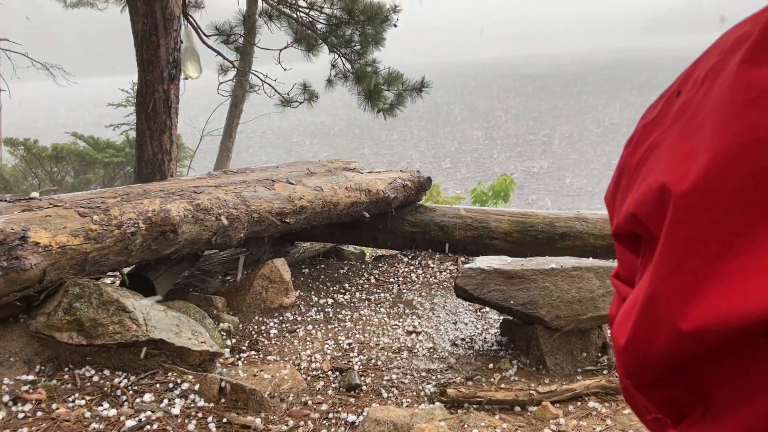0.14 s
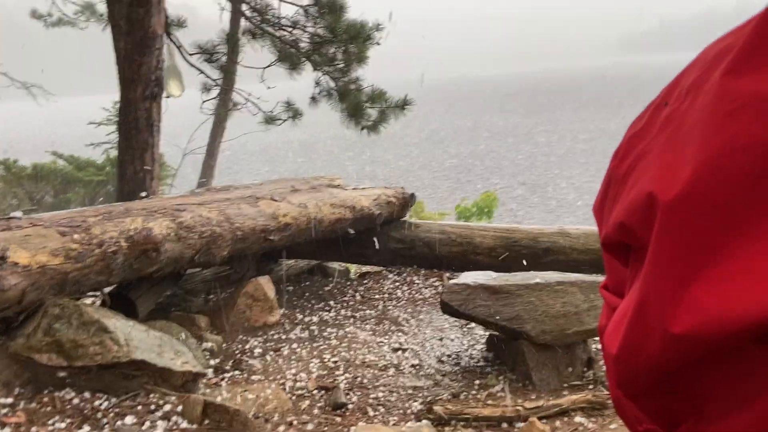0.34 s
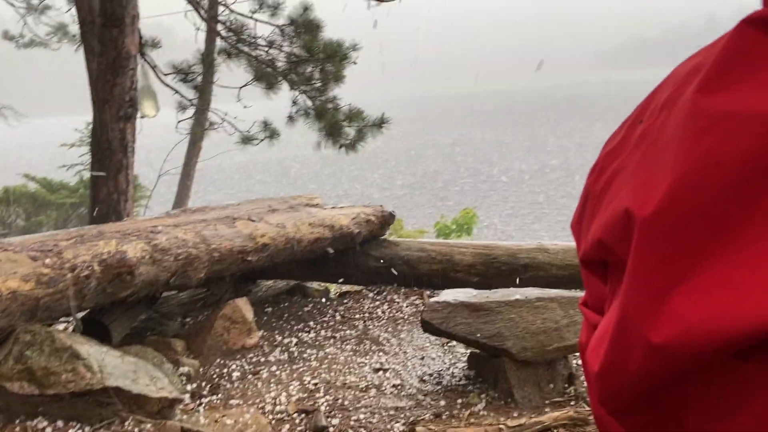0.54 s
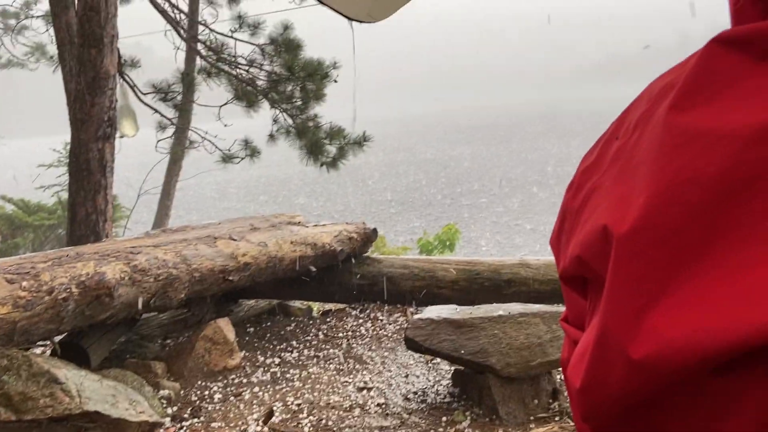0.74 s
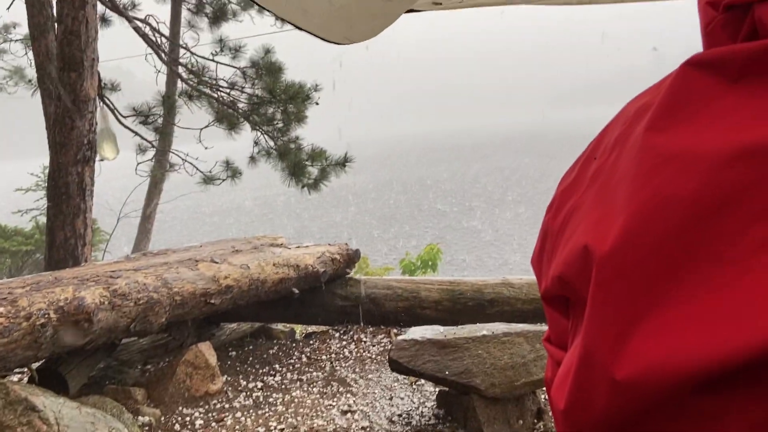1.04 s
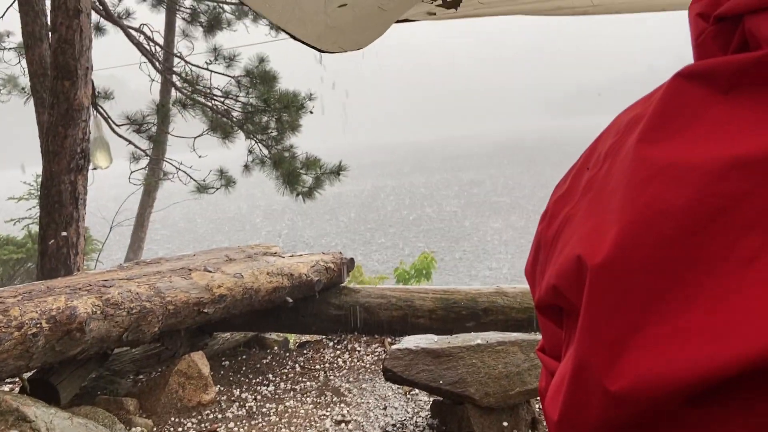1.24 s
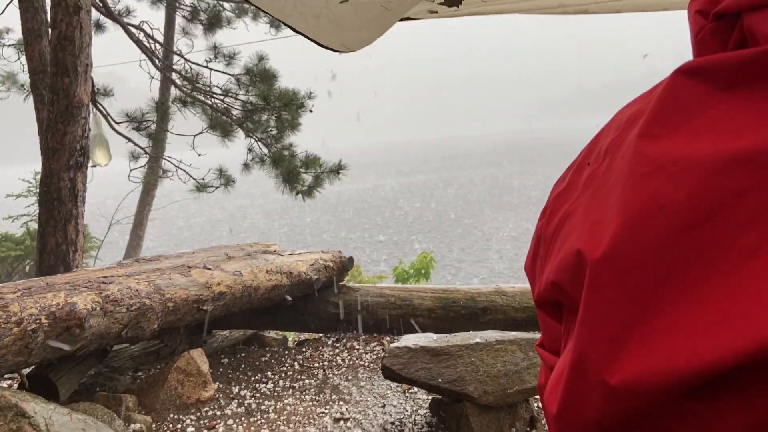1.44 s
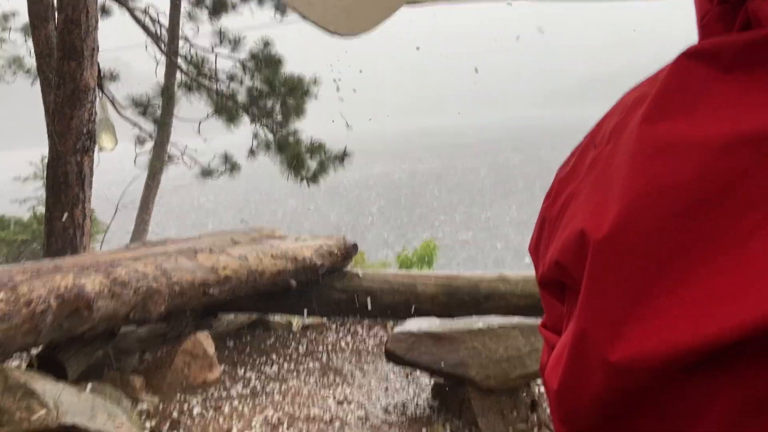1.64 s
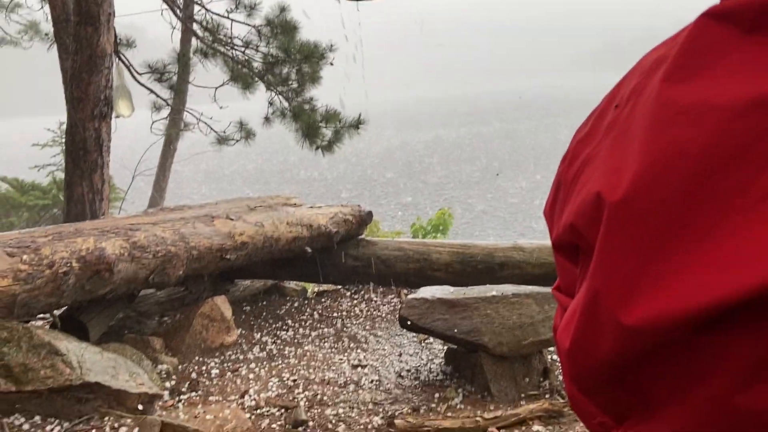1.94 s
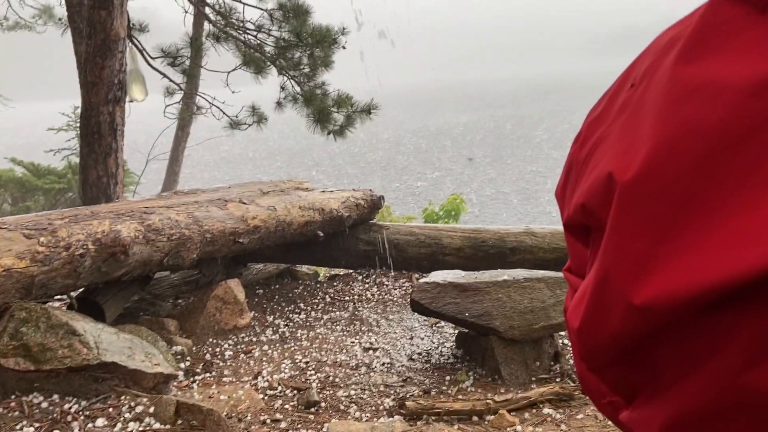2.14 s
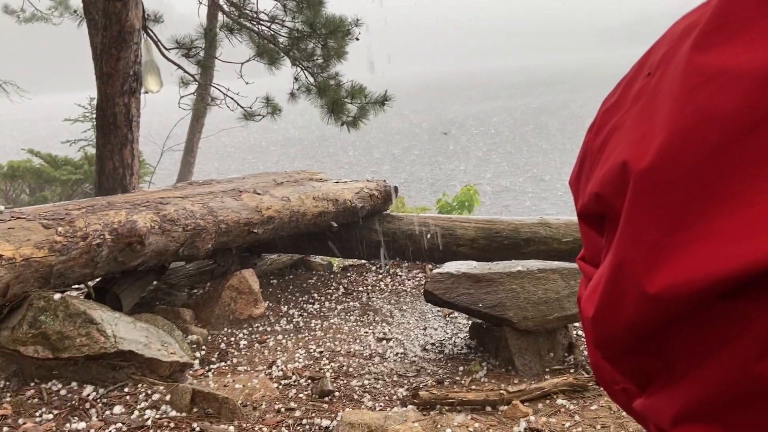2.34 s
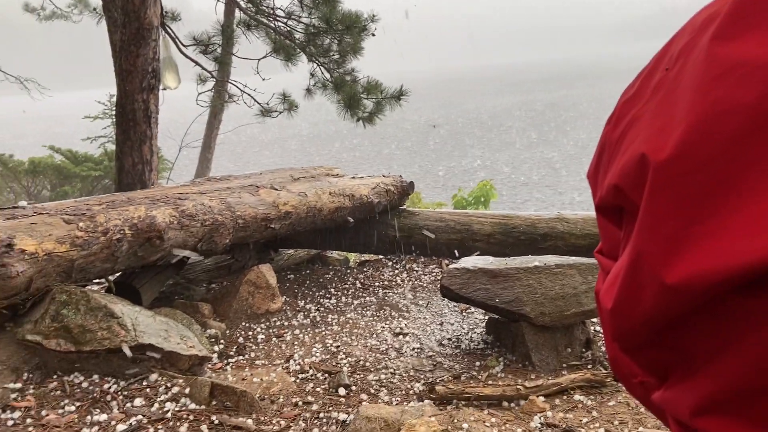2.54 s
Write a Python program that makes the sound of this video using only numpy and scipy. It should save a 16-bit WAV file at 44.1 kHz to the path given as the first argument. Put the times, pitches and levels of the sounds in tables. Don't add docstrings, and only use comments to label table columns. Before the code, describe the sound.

Close, loud, unbroken hail on taut cloth at an outdoor camp: irregular knocks and slaps, thuds from the swaying sheet, crackling ice, ticks on rock and log, a few near splashes, over a wide rain hiss.

```python
import sys
import numpy as np
from scipy import signal
from scipy.fft import rfft, irfft
from scipy.io import wavfile
from scipy.ndimage import uniform_filter1d

SR = 44100
rng = np.random.default_rng(int(sys.argv[2]) if len(sys.argv) > 2 else 0)


def wav_record(signal):
    frames = np.transpose(np.atleast_2d(signal))
    bounded = np.clip(frames, -1, 1)
    quanta = np.round(bounded * 32767).astype(np.int16)
    wavfile.write(sys.argv[1], SR, quanta)


def gain_from_db(level_db):
    decades = np.asarray(level_db, float) / 20
    return 10 ** decades


N = 119070

# (time [s], slap level [dB], knock over slap [dB], knock pitch
# [Hz], crack over slap [dB])
STONES = [(0.119, -12, -4, 804, -0.5), (0.132, -23, 13.5, 556, -17), (0.16, -18.5, 6.5, 755, -20),
          (0.229, -18.5, 6, 797, -15), (0.247, -12.5, -9, 1480, -1), (0.261, -11.5, 2, 614, -2.5),
          (0.314, -10.5, -4, 790, -2), (0.367, -14, -25, 603, -2), (0.461, -14, 7.5, 626, 4),
          (0.47, -16, 10, 900, -1), (0.561, -16.5, 7.5, 720, 6), (0.583, -9, -6, 842, -27),
          (0.655, -21, 14, 694, -10), (0.68, -21.5, 8.5, 603, -14), (0.744, -25.5, 20.5, 1126, 13),
          (0.761, -7.5, -4, 685, -1), (0.874, -5, -5.5, 1190, -3), (0.902, -8.5, 0, 600, -7),
          (0.919, -14, 4, 659, -10), (0.934, -13, -8, 716, -1),
          (0.949, -11, 0.5, 870, 4), (0.967, -10, 5.5, 560, -24), (0.994, -10, 2, 720, 1.5),
                 (1.019, -15.5, -2, 603, -4), (1.052, -11, 1, 1500, 0), (1.073, -18.5, 10, 900, 4),
                 (1.084, -9, 3.5, 800, -10), (1.133, -12.5, 6.5, 1090, -10), (1.155, -15.5, 10.5, 710, -11),
                 (1.217, -22.5, 15.5, 664, -10), (1.236, -24, 13.5, 675, -13), (1.271, -8.5, 3.5, 790, -17),
                 (1.307, -16, 3.5, 830, -3), (1.345, -18.5, 10.5, 815, -7), (1.426, -15.5, 1, 1110, -13),
                 (1.472, -8.5, 1.5, 935, -6), (1.528, -28.5, 14, 1250, -9), (1.566, -17.5, 6.5, 810, 4),
                 (1.609, -11, 0, 617, -10), (1.625, -20.5, 10.5, 1420, -13), (1.692, -13, 7.5, 1140, -28),
          (1.732, -10, -13, 600, 0.5), (1.745, -23, 12, 600, -4), (1.768, -28, 9, 594, -10),
               (1.81, -11, -1, 890, -7), (1.829, -8.5, -1.5, 714, -4), (1.874, -11.5, 4, 1090, 0.5),
               (1.928, -6.5, -1, 830, -6), (2.06, -20, 9, 685, -6), (2.073, -19.5, 11, 1330, 0),
               (2.131, -12, -5, 980, -10), (2.171, -23, 9, 713, -8), (2.197, -11.5, 2.5, 738, -5),
               (2.213, -12, 4.5, 1370, 3), (2.275, -12.5, 4, 2080, -22), (2.353, -11.5, -4, 673, -6),
               (2.405, -23, 11, 746, -9), (2.431, -21.5, 14, 638, 5.5), (2.493, -19.5, 13, 560, -5),
               (2.504, -18.5, 5, 760, 6), (2.528, -18, 5, 770, -9), (2.581, -13, 0.5, 600, 1),
               (2.629, -26, 15, 641, -14), (2.646, -20, 3.5, 2140, -2)]
# (time [s], peak level [dB], pitch [Hz])
BOOMS = [
    (0.269, -19, 70),
    (0.55, -19, 117),
    (0.941, -19.5, 70.4),
    (1.059, -11, 134),
    (1.271, -20, 89),
    (1.927, -16.5, 81),
    (2.195, -13, 115),
    (2.479, -18, 97),
    (2.635, -14, 84),
]
# (time [s], peak level [dB], pitch [Hz])
SWAYS = [(.31, -24, 79.6), (.37, -24, 95), (0.462, -14.5, 160), (0.544, -13.5, 164), (0.752, -18, 170),
         (1.28, -21, 100), (.995, -20, 81), (1.127, -19.5, 87.5), (1.463, -25, 127), (1.55, -24, 84.5),
         (1.598, -19, 160), (2.071, -22, 147), (2.199, -15.5, 167), (2.245, -19.5, 70.6),
         (2.271, -18.5, 160), (2.529, -20.5, 75)]
# (time [s], peak level [dB], slap pitch [Hz])
PEBBLES = [(.005, -19, 483), (.045, -21, 756), (.057, -21, 685), (0.139, -7, 480), (0.227, -19, 1080),
           (.283, -17, 540), (.334, -14.5, 664), (0.344, -14, 490), (.385, -15, 450), (.437, -20, 567),
           (0.477, -10, 435), (.527, -17.5, 600), (.545, -18, 680), (.66, -12.5, 890), (0.705, -20.5, 590),
           (.852, -17, 405), (0.981, -14, 390), (1.028, -16, 880), (1.118, -17, 730), (1.182, -12, 296),
           (1.264, -17, 666), (1.323, -15, 350), (1.399, -19, 550), (1.646, -13.5, 484), (1.749, -10, 470),
           (1.783, -12.5, 660), (1.856, -31, 726), (1.901, -17, 554), (1.96, -14.5, 373),
           (2.19, -17.5, 730), (2.231, -14.5, 356), (2.637, -14.5, 395), (2.671, -15, 690),
           (1.053, -8, 540), (.995, -7, 454)]
# (time [s], peak level [dB], pitch [Hz])
SHARDS = [(.003, -14, 5100), (.335, -13, 3490), (.416, -9, 2290), (0.658, -24, 1800), (.852, -15, 4800),
          (0.933, -15, 1720), (1.083, -8, 1710), (1.218, -11, 1600), (1.693, -25, 1900), (1.749, -18, 2030),
          (2.221, -9, 4880), (2.352, -11, 2910), (2.424, -12, 4000), (2.492, -18, 2330),
          (2.647, -10.5, 4360)]
# (time [s], peak level [dB], pitch [Hz])
TICKS = [(0.0136, -5, 2430), (0.0568, -7.5, 2470), (0.349, -17, 3130), (0.5219, -8, 4560),
         (0.5451, -9.5, 2210), (0.9487, -9, 3040), (0.9948, -13, 2090), (1.3616, -6.5, 2650),
         (2.1262, -12, 2780), (2.2304, -9.5, 2920), (2.376, -9, 3150), (2.6383, -8.5, 1860)]
# (time [s], peak level [dB])
SPLASHES = [
    (0.347, -9),
    (0.993, -29),
    (1.32, -7),
    (2.0802, -3.5),
]
# (time [s], level [dB])
POUR = [(0, -5.5), (.06, -6), (.09, -6.5), (.13, -5.5), (.5, -4.5), (.9, -3.5), (1.2, -3.5), (1.499, -4.5),
        (2.2, -4.5), (2.7, -4)]
# (frequency [Hz], level per Hz [dB])
WASH_SPECTRUM = [(30, -1), (60, -2), (150, -3.5), (225, -14.5), (350, -7), (1500, -16.5), (5500, -22),
                 (15000, -33)]
# (frequency [Hz], correlation [-1..1])
WASH_LIKENESS = [(60, 0.98), (170, 0.98), (400, 0.2), (900, 0.25), (1900, 0.013), (2600, 0.69),
                 (5000, 0.32), (6000, 0.033)]
# (frequency [Hz], left over right [dB])
LEAN = [(200, -2.5), (450, 2), (1600, -1.5), (2600, 3.5), (5000, 2)]
APART_TIMES_S = [.005, .345, .76, .95, .993, 1.318, 1.74, 2.082, 2.322]

SLAP_HZ, SLAP_GLIDE, SLAP_PEAK_S, SLAP_DB = 385, .4, .0046, 0
SAG_HZ, SAG_S, SAG_DB = 150, .012, -12
KNOCK_WIDTH_HZ, KNOCK_S, KNOCK_DB = 420, .004, 4
CRACK_HZ, CRACK_S, CRACK_DB = 2600, .0045, 2
SPRAY_S, SPRAY_DB = .016, -13
BOOM_TURNS, BOOM_DB, SWAY_TURNS = 2.2, 0, 2.88
PEBBLE_KNOCK_DB, PEBBLE_CRACK_DB = 0, -1
SHARD_S, TICK_S, TICK_DB = .015, .004, 2
PATTER_PER_S, PATTER_DB, PATTER_SPREAD_DB = 330, -26.5, 2.5
DROPS_PER_S, DROPS_DB, DROPS_SPREAD_DB = 600, -27, 4.0
WASH_DB = -18.5
EARS_ALIKE = .35
MERGE_HZ, MERGE_WIDTH_HZ = 6500, 39
IN_STEP_HZ, TURN_HZ = 6950, 4160
EDGE_HZ = 15850
APART_S, WAVER_RAD = .009, .21
SIDES = np.array([[1], [-1]])


def evened(x):
    return x / np.sqrt(np.mean(x ** 2) + 1e-20)


def read(points, hz):
    f, value = np.transpose(points)
    return np.interp(np.log(hz + 1), np.log(f + 1), value)


def add(mix, s, sound):
    part = mix[:, max(round(s * SR), 0):][:, :sound.shape[-1]]
    part += sound[..., :part.shape[-1]]


def hump(t, peak_s, steep):
    return (t / peak_s * np.exp(1 - t / peak_s)) ** steep


def burst(t, hz, width_hz, decay_s):
    r = np.exp(-np.pi * width_hz / SR)
    a, b, c = rng.standard_normal((3, len(t)))
    ragged = gain_from_db(4.0 * evened(uniform_filter1d(c, size=40)))
    ragged = ragged * np.minimum(t / .0008, 1) * np.exp(-t / decay_s)
    puff = ragged * np.array([a, EARS_ALIKE * a + np.sqrt(1 - EARS_ALIKE ** 2) * b])
    z = signal.lfilter([1, -.5, -.4], [1, -2 * r * np.cos(2 * np.pi * hz / SR), r * r], puff)
    return z / abs(z).max()


def stone(slap_db, knock_db, knock_hz, crack_db):
    t = np.arange(2000) / SR
    tune, phase, lag = rng.uniform(-1, 1, 3)
    hz = SLAP_HZ * (1 + .1 * tune) * (SLAP_PEAK_S / (t + .001)) ** SLAP_GLIDE
    turns = np.cumsum(hz) / SR + .25 * phase + .09 * lag * SIDES
    slap = gain_from_db(SLAP_DB) * hump(t, SLAP_PEAK_S, steep=3.6) * np.sin(2 * np.pi * turns)
    sag_turns = SAG_HZ * (1 + 0.5 * tune) * t + phase
    sag = gain_from_db(SAG_DB) * hump(t, SAG_S, steep=3.8) * np.sin(2 * np.pi * sag_turns)
    knock = gain_from_db(knock_db + KNOCK_DB) * burst(t, knock_hz, KNOCK_WIDTH_HZ, KNOCK_S)
    crack = burst(t, CRACK_HZ, 2700, CRACK_S) + gain_from_db(SPRAY_DB) * burst(t, 1900, 2400, SPRAY_S)
    blow = slap + sag + knock + gain_from_db(crack_db + CRACK_DB) * crack
    return blow * gain_from_db(slap_db + 1.8 * lag * SIDES)


def stones():
    mix = np.zeros((2, N))
    for s, *row in STONES:
        add(mix, s, stone(*row))
    return mix


def sheet():
    mix = np.zeros((2, N))
    t = np.arange(4000) / SR
    for s, db, hz in BOOMS:
        swell = hump(t, BOOM_TURNS / hz / 2, steep=3.5)
        add(mix, s, gain_from_db(db + BOOM_DB) * swell * np.sin(2 * np.pi * hz * t))
    t = np.arange(5000) / SR
    for s, db, hz in SWAYS:
        swell = hump(t, SWAY_TURNS / hz / 2, steep=1.9)
        add(mix, s, gain_from_db(db) * swell * np.sin(2 * np.pi * hz * t))
    return mix


def pebbles():
    mix, t = np.zeros((2, N)), np.arange(2400) / SR
    for s, db, hz in PEBBLES:
        falling_hz = hz * (.003 / (t + .001)) ** SLAP_GLIDE
        turns = np.cumsum(falling_hz) / SR + rng.uniform(-.1, .1, (2, 1))
        slap = hump(t, 0.0026, steep=2.9) * np.sin(2 * np.pi * turns)
        knock = gain_from_db(PEBBLE_KNOCK_DB) * burst(t, 2.04 * hz, KNOCK_WIDTH_HZ, KNOCK_S)
        crack = gain_from_db(PEBBLE_CRACK_DB) * burst(t, CRACK_HZ, 2800, CRACK_S)
        add(mix, s, gain_from_db(db) * (slap + knock + crack))
    return mix


def shards():
    mix, t = np.zeros((2, N)), np.arange(2400) / SR
    for s, db, hz in SHARDS:
        add(mix, s, gain_from_db(db) * burst(t, hz, 0.38 * hz, SHARD_S))
    return mix


def ticks_and_splashes():
    mix, t = np.zeros((2, N)), np.arange(4000) / SR
    for s, db, hz in TICKS:
        add(mix, s, gain_from_db(db + TICK_DB) * burst(t, hz, 800, TICK_S))
    for s, db in SPLASHES:
        add(mix, s, gain_from_db(db - 5.0) * burst(t, 16000, 9000, 0.0026))
    return mix


def scatter(shapes, per_s, spread_db):
    hit = rng.random(N) < per_s / SR
    size = gain_from_db(spread_db * np.minimum(rng.exponential(1, N), 3)) * hit
    size = size * rng.choice([-1., 1.], N)
    kind = rng.integers(0, len(shapes), N)
    total = np.zeros((2, N))
    for k, shape in enumerate(shapes):
        total += signal.oaconvolve((size * (kind == k))[None], shape, axes=1)[:, :N]
    return evened(total)


def patter():
    t = np.arange(400) / SR
    small = [stone(4.0 * a, -2.5 + 5.0 * b, 1000 * 1.9 ** d, -9 + 4.0 * c)
             for a, b, c, d in rng.uniform(-1, 1, (24, 4))]
    drops = [burst(t, hz, .8 * hz, .002) * gain_from_db(-2.2 * np.log2(hz / 1000))
             for hz in np.geomspace(600, 12000, num=24)]
    return (gain_from_db(PATTER_DB) * scatter(small, PATTER_PER_S, PATTER_SPREAD_DB)
            + gain_from_db(DROPS_DB) * scatter(drops, DROPS_PER_S, DROPS_SPREAD_DB))


def wash():
    frames, hz = N // 128 + 9, np.fft.rfftfreq(512, 1 / SR)
    a, b, c, d, patches = rng.standard_normal((frames, 257, 5)).T
    patches = uniform_filter1d(patches, size=8, axis=0)
    patches = evened(uniform_filter1d(patches, size=12, axis=1))
    flicker = evened(uniform_filter1d(rng.standard_normal(frames), size=4))
    same = np.clip(read(WASH_LIKENESS, hz), -1, 1)[:, None]
    left = a + 1j * b
    right = same * left + np.sqrt(1 - same ** 2) * (c + 1j * d)
    flicker_share = (hz / (hz + 300.))[:, None]
    z = np.array([left, right]) * gain_from_db(.9 * patches + 1.9 * flicker * flicker_share)
    x = signal.istft(z, nperseg=512, noverlap=384)[1][:, :N]
    colour = gain_from_db(read(WASH_SPECTRUM, np.fft.rfftfreq(N, 1 / SR)))
    return gain_from_db(WASH_DB) * evened(irfft(rfft(x) * colour, N))


def scene():
    s, db = np.transpose(POUR)
    pour = gain_from_db(np.interp(np.arange(N) / SR, s, db))
    near = stones() + sheet() + pebbles() + shards() + ticks_and_splashes()
    return near + (patter() + wash()) * pour


def roll_off(x):
    return signal.sosfilt(signal.butter(12, 15900, fs=SR, output="sos"), x)


def record(dry):
    hz, z = np.fft.rfftfreq(N, 1 / SR), rfft(np.tanh(dry))
    one = 1 / (1 + np.exp((MERGE_HZ - hz) / MERGE_WIDTH_HZ))
    balance = gain_from_db((0.5 - one) * read(LEAN, hz) * .5 * SIDES)
    low_cut = hz ** 4 / (hz ** 4 + 42 ** 4)
    high_cut = (hz < EDGE_HZ) / (1 + (hz / 16200) ** 12)
    z = z * balance * low_cut * high_cut
    late = np.sqrt(one) * z[0] * np.exp(2j * np.pi * (hz - IN_STEP_HZ) / TURN_HZ)
    own = np.sqrt(1 - one) * z[1]
    left, free, low, late, turned = irfft(np.array([*z, own, late, 1j * late]), N)
    waver = WAVER_RAD * evened(uniform_filter1d(rng.standard_normal(N), size=2500))
    right = low + np.cos(waver) * late + np.sin(waver) * turned
    t = np.arange(N) / SR
    apart = sum(1. * (t >= s) * (t < s + APART_S) for s in APART_TIMES_S)
    apart = uniform_filter1d(apart, size=300)
    return roll_off(np.array([left, right + apart * (free - right)]))


dry = scene()
out = record(dry)
wav_record(out)
```